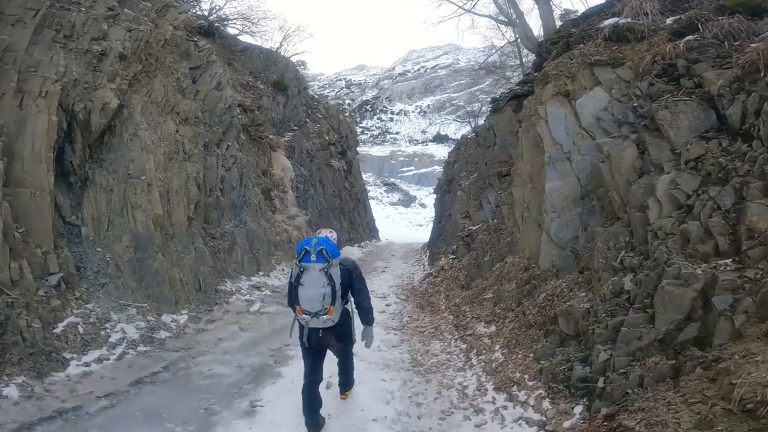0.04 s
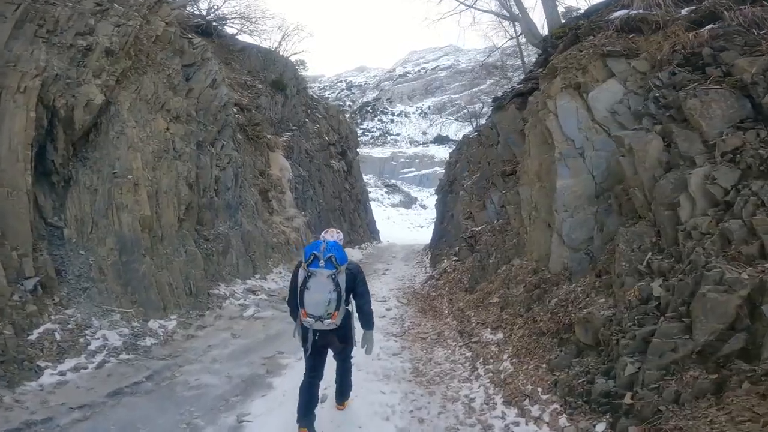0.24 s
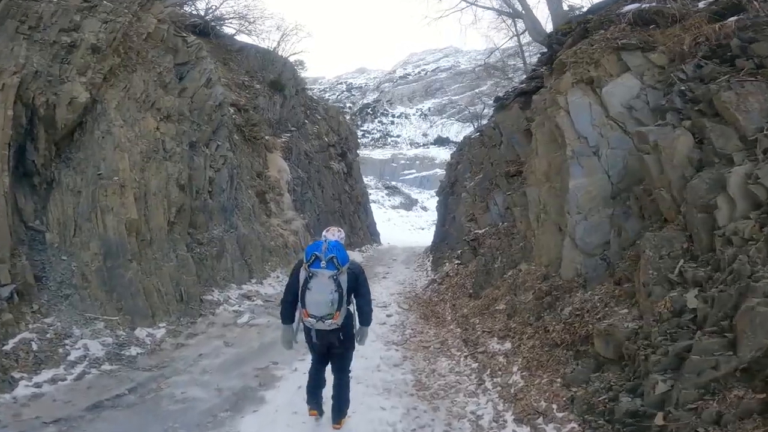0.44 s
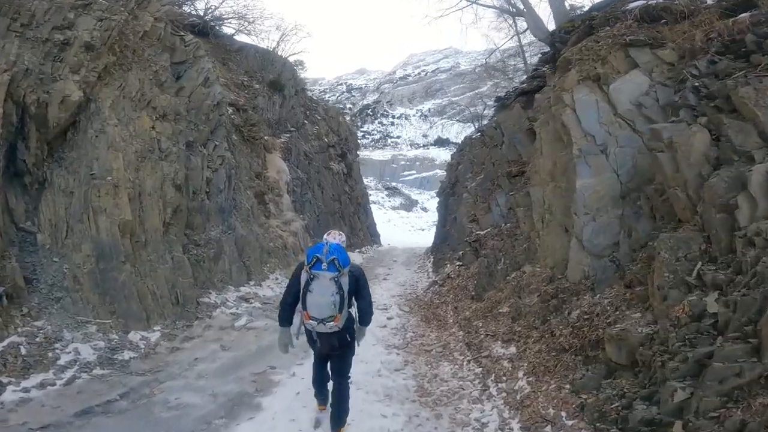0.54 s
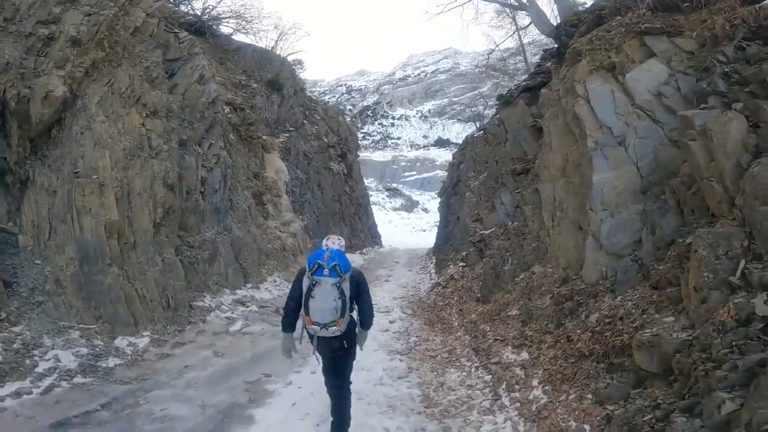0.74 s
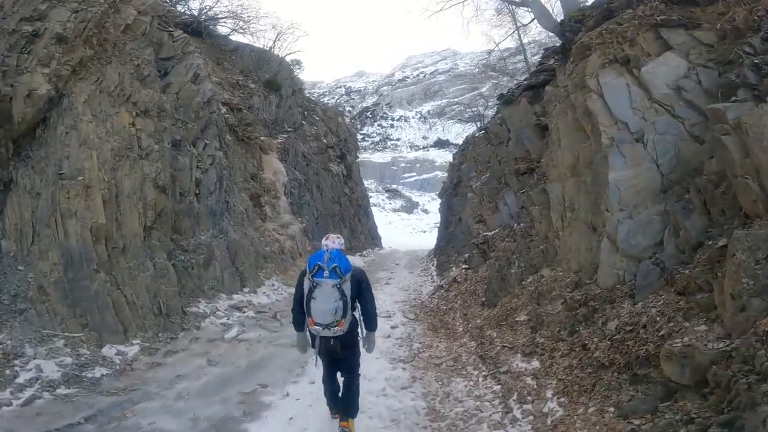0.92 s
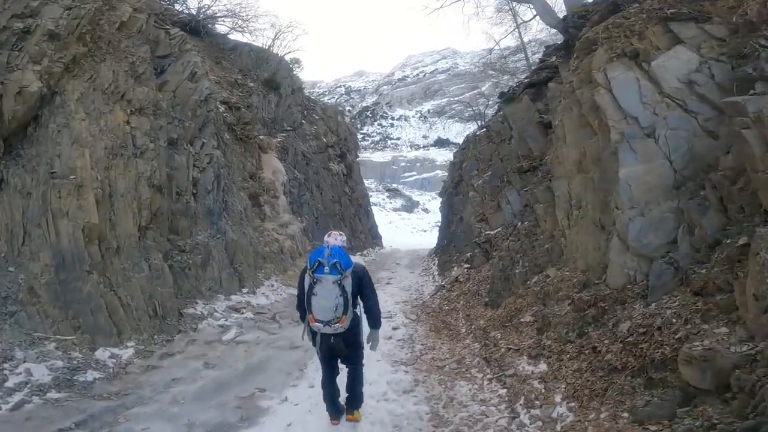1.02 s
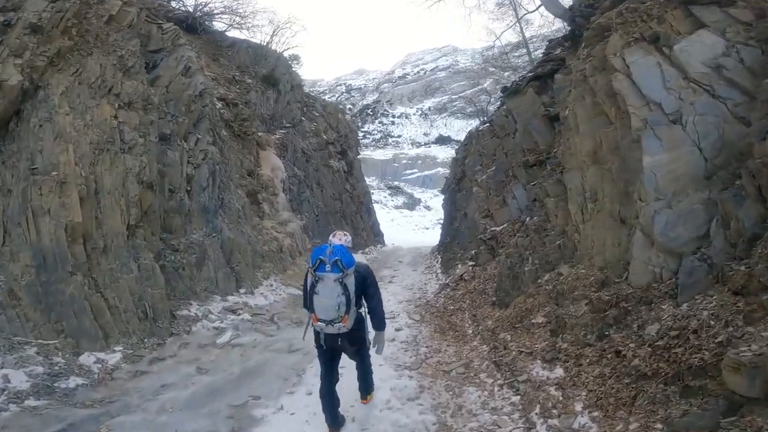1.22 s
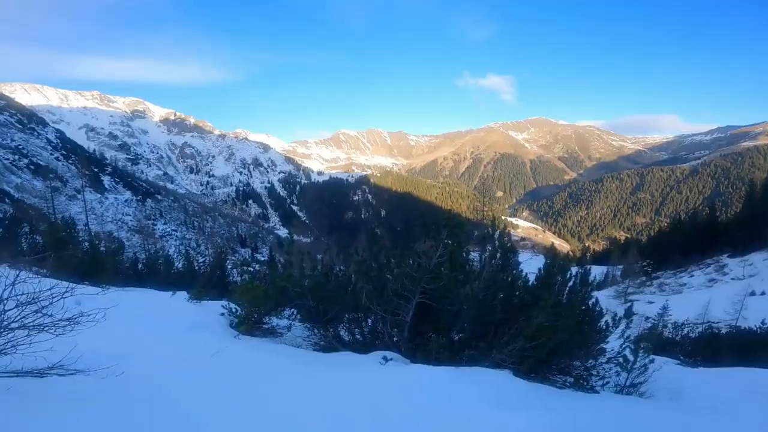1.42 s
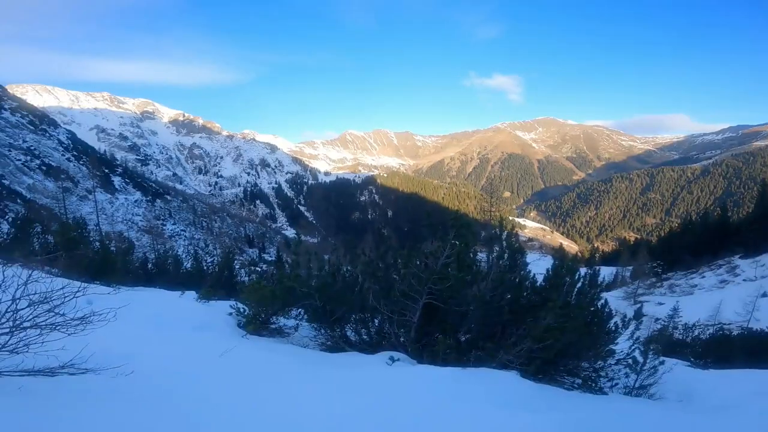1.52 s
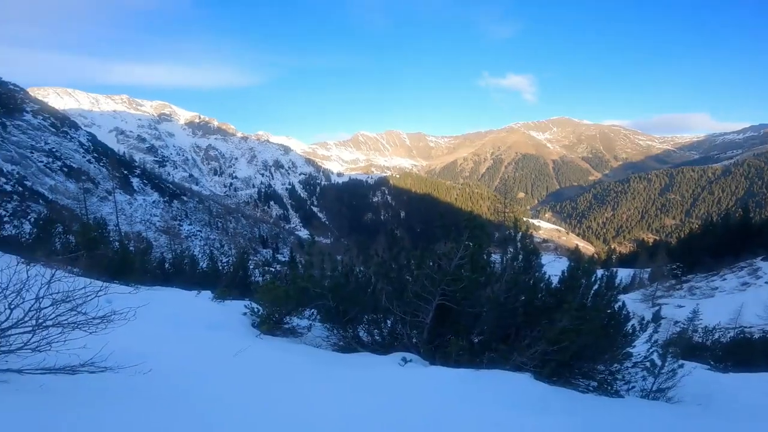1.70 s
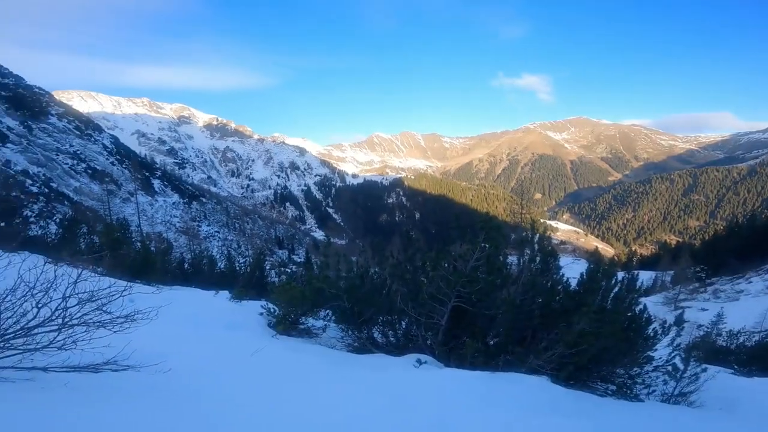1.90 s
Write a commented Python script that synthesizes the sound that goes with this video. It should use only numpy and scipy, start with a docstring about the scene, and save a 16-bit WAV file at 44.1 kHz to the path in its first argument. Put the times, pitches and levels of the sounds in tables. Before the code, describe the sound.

Boots crunch twice on icy grit, close to the microphone between rock walls, with a low wind gust thumping in between. The steps cut off abruptly, leaving a quiet valley with a light breeze and faint ticks.

```python
"""A hiker's two crunching steps on icy grit, close to the microphone in a rock cutting.
The crust snaps under the boot, then crumbles into dense grains; the walls give a short echo.
Between the steps a gust thumps the microphone. A third step has just begun when the scene
changes abruptly to a quiet snowy valley: a light breeze, far wind and a few faint ticks."""
import sys
import numpy as np
from scipy import signal
from scipy.fft import rfft, irfft, next_fast_len
from scipy.io import wavfile
from scipy.ndimage import uniform_filter1d, map_coordinates

SR = 44100
rng = np.random.default_rng(int(sys.argv[2]) if len(sys.argv) > 2 else 0)


def persist_wave(psi):
    """Save psi, clipped to +-1, as 16-bit WAV."""
    counts = np.round(np.clip(psi, -1, 1) * 32767).astype(np.int16)
    wavfile.write(sys.argv[1], SR, np.atleast_2d(counts).T)


N = 85995

# far wind in the valley, and wind pressure right on the microphone: (time [s], level [dB])
FAR_WIND_LEVEL = [(1.37, -55.5), (1.45, -60.5), (1.62, -56.5), (1.72, -60)]
RUMBLE_LEVEL = [(0, -38.5), (.058, -30), (.10, -35), (.17, -33), (.26, -44), (.35, -30.5), (.70, -30),
                (.76, -40.5), (.83, -39.5), (.89, -33.5), (.93, -38.5), (.975, -31), (1.05, -37),
                (1.125, -30), (1.17, -35.5), (1.32, -38), (1.46, -57), (1.54, -43.5), (1.72, -48.5),
                (1.76, -39), (1.83, -45), (1.95, -46.5)]
# the strong gust: (time [s], level [dB], rate at which eddies sweep past the microphone [Hz])
GUST_SWEEP = [(.33, -51, 60.03), (.378, -23.5, 85), (.395, -17, 144.9), (.426, -11.5, 204.6),
              (.452, -23.5, 99.7), (.478, -20, 120.8), (.503, -12, 205.6), (.535, -15, 109.8),
              (.568, -12.5, 119.5), (.595, -14.5, 58), (.645, -23.5, 60.8), (.68, -18.5, 76.4),
              (.708, -22, 54.8), (.745, -62, 50.2)]
# wind spectra: (frequency [Hz], relative density [dB])
FAR_WIND_SPECTRUM = [(100, -4.5), (260, -5), (370, 3), (520, -7.5), (900, -24.5), (1500, -12.5),
                     (2000, -20.5), (2700, -31), (7000, -34.5), (12000, -45.5), (15000, -67)]
RUMBLE_SPECTRUM = [(12, -6), (30, 6.5), (62, 0), (100, -10), (170, -15), (300, -26.5), (500, -47.5),
                   (4000, -120)]
EDDY_SPECTRUM = [(20, -7), (65, 0), (115, -0.5), (175, -9.5), (260, -19), (400, -34.5), (900, -62),
                 (4000, -120)]  # at the sweep rate EDDY_HZ

# soft rustles in the valley: (time [s], level [dB], t60 [s])
VALLEY_RUSTLES = [(1.357, -60.5, 0.37), (1.612, -59, 0.11)]
# faint dry ticks in the valley: (time [s], level before the tone filter [dB], pitch [Hz], knock [dB])
VALLEY_TICKS = [(1.517, -41, 910, -56), (1.587, -50, 1200, -51), (1.614, -54, 644, -42.5),
                (1.696, -49, 1080, -53), (1.774, -44.5, 1320, -49), (1.793, -47, 710, -48),
                (1.828, -53, 1250, -42.5), (1.884, -48, 1490, -43)]
# tone filters of the rustles and ticks: (frequency [Hz], gain [dB])
RUSTLE_FILTER = [(200, -16), (700, 6), (1500, 1), (2600, 1), (3500, -11), (5000, -28), (12000, -44)]
TICK_FILTER = [(300, 4), (1600, -2.5), (3000, -14.5), (9000, -12)]
# dull knocks under some of the contacts: (time [s], level [dB], pitch [Hz])
CONTACT_THUDS = [(0.069, -26.5, 215), (.168, -21, 188), (.718, -24.5, 224), (0.758, -24, 189),
                 (1.066, -26.5, 176), (1.341, -30, 163), (1.521, -33.5, 199)]

# loose grit shifting underfoot: (time [s], level [dB])
SHUFFLE_LEVEL = [(0, -42), (.04, -48), (.16, -44.5), (.36, -42.5), (.47, -50.5), (.58, -49), (.64, -38.5),
                 (.70, -42), (.8, -40.5), (1.08, -68), (1.2, -61.5), (1.3, -67)]
# the boot rolling on the grit:
# (time of full load [s], hold [s], level [dB], rise [dB/s], fall [dB/s], fizz re crunch [dB])
BOOT_STEPS = [(0.23, 0.069, -29.5, 149.5, 221, -37), (0.854, 0.11, -26.5, 139, 208, -50)]
# the crust snapping: (time [s], level [dB], pitch [Hz], attack [s], t60 [s], splinters re ring [dB])
CRUST_SNAPS = [(.067, -22, 1010, 0.0005, 0.019, -18), (.110, -29, 1040, 0.00062, 0.011, -25),
               (.136, -34, 1145, 0.0049, 0.032, -18), (.167, -27, 1064, 0.0018, .022, -8),
               (.179, -28.5, 915, 0.0012, 0.027, -24), (.211, -26.5, 1754, .003, 0.026, -5.5),
               (0.239, -30, 2970, 0.0049, 0.034, -11), (0.2494, -15.5, 1647, 0.00058, 0.02, -6),
               (0.309, -28, 956, .003, 0.036, -9), (.369, -31.5, 1175, 0.0045, 0.039, -15),
               (.418, -31, 900, 0.0061, 0.045, -9), (0.435, -27.5, 603, .003, 0.036, -16),
               (0.4848, -45, 7200, .0005, 0.011, 3), (.606, -39, 2772, .006, 0.066, -4),
               (0.6136, -16, 726, 0.00063, 0.027, -9.5), (.672, -26.5, 844, 0.0014, 0.027, -11),
               (.715, -37, 752, .005, 0.04, -7), (.758, -28.5, 874, 0.0022, 0.07, 0),
               (.782, -24.5, 1787, 0.0011, 0.021, 1), (.853, -23.5, 798, 0.0032, 0.039, -6.5),
               (.883, -25, 1900, 0.0033, 0.043, -4), (.968, -35, 4480, 0.0018, 0.024, 3),
               (.974, -22, 1003, 0.002, 0.028, -12), (1.000, -28.5, 1203, 0.0045, 0.05, -7.5),
               (1.038, -32, 567, 0.0057, 0.036, -8), (1.172, -39, 1390, 0.00043, 0.015, -16),
               (1.306, -37, 1196, 0.0004, 0.027, -12.5), (1.340, -35, 1057, 0.0011, 0.052, -8)]
# spectra of the ice and grit at the boot: (frequency [Hz], relative density [dB])
SHUFFLE_SPECTRUM = [(100, -5.5), (200, 1.5), (550, 0), (1300, 1), (2200, -6), (4000, -11), (6000, -19.5),
                    (7500, -23.5), (9500, -33), (15000, -53)]
SCUFF_SPECTRUM = [(100, -21), (600, -8), (1200, 2.5), (2200, -1.5), (3200, -15.5), (7500, -26),
                  (15000, -57)]
CRUNCH_SPECTRUM = [(88, -26.5), (150, 0.5), (238, 3.5), (306, 2.5), (458, -4), (784, -3.5), (1760, -3),
                   (5910, -21), (7200, -24), (9190, -39.5), (12500, -48), (14900, -77)]
FIZZ_SPECTRUM = [(500, -53.5), (5000, -21.5), (8000, -4), (10000, -4), (13000, -1), (15000, -12)]
CRUMB_SPECTRUM = [(100, -19), (800, -15.5), (1400, -6), (2200, -6), (3800, -2), (6000, -7), (7500, -7.5),
                  (9500, -19.5), (14000, -28)]
SPLINTER_SPECTRUM = [(100, -23), (500, 7.5), (1000, 7), (2000, 2.5), (3000, -2.5), (4500, -3.5),
                     (6000, -18), (7500, -15), (9500, -35), (12500, -39), (15000, -62)]

VALLEY_START_S, EDDY_HZ, TOP_HZ = 1.357, 150, 15000
WALL_T60_S, WALL_DB = 0.13, -12.5
GRAIN_HZ, GRAIN_OCTAVES, GRAIN_T60_CYCLES, POWDER_DB = 2060, 4.2, 3.8, -3
RING_ROUGHNESS, RING_SPLIT = .12, 0.1397  # phase noise; share by which two modes flank the pitch
SCUFF_S, SCUFF_DB, SCUFF_ATTACK_S = 1.304, -47.5, .004
CRUMB_RE_STEP_DB, CRUMB_DELAY_S, CRUMB_RISE_DB_PER_S, CRUMB_FALL_DB_PER_S = -23.5, 0.019, 288, 58.5


def amp(db):
    """Decibels to gain."""
    return 10 ** (np.asarray(db) / 20)


def unit(x):
    """Scale to rms 1."""
    return x / np.sqrt(np.mean(x ** 2) + 1e-20)


def curve(rows):
    """(time [s], value) points as one value per sample."""
    return np.interp(np.arange(N) / SR, *np.transpose(rows))


def colour(x, points):
    """Minimum-phase filter through (frequency [Hz], gain [dB]) points."""
    size = 2 * next_fast_len(len(x))
    hz, db = np.transpose(points)
    gain = amp(np.interp(np.log(np.fft.rfftfreq(size, 1 / SR) + 1), np.log(hz), db))
    cepstrum = irfft(np.log(gain), size)
    cepstrum[1:size // 2] *= 2  # folding onto positive time makes the filter causal
    cepstrum[size // 2 + 1:] = 0
    return irfft(rfft(x, size) * np.exp(rfft(cepstrum)), size)[:len(x)]


def noise(spectrum):
    """Coloured noise of rms 1."""
    return unit(colour(rng.standard_normal(N + SR), spectrum)[-N:])


def even(x, span_s):
    """Hold a noise at a steady strength over span_s."""
    power = uniform_filter1d(x ** 2, max(int(span_s * SR), 2))
    return x / np.sqrt(np.abs(power) + 1e-9)


def add(track, start_s, sound):
    """Mix a sound in at start_s."""
    part = track[max(round(start_s * SR), 0):][:len(sound)]
    part += sound[:len(part)]


def far_wind():
    """A soft wash of air from far off in the valley."""
    return amp(curve(FAR_WIND_LEVEL)) * noise(FAR_WIND_SPECTRUM)


def microphone_rumble():
    """The breeze presses directly on the microphone."""
    return amp(curve(RUMBLE_LEVEL)) * even(noise(RUMBLE_SPECTRUM), span_s=0.0433)


def gust():
    """Eddies sweep past the microphone: the faster the gust, the higher its flapping reaches."""
    rows = np.array(GUST_SWEEP)
    level_db, sweep_hz = curve(rows[:, :2]), curve(rows[:, [0, 2]])
    travel = np.cumsum(sweep_hz / EDDY_HZ)
    pressure = map_coordinates(noise(EDDY_SPECTRUM), [travel], mode="mirror")
    return amp(level_db) * even(pressure, span_s=.025)


def rock_walls(direct):
    """The direct sound plus a short diffuse echo from the sides of the cutting."""
    t = np.arange(SR // 4) / SR
    tail = rng.standard_normal(len(t)) * amp(-60 * t / WALL_T60_S) * (t > .004)
    echo = signal.fftconvolve(direct, tail / np.linalg.norm(tail))[:N]
    return direct + amp(WALL_DB) * echo


def thud(hz, t60):
    """A dull knock: one quickly damped mode."""
    t = np.arange(SR // 5) / SR
    return np.sin(2 * np.pi * hz * t) * amp(-60 * t / t60)


def small_contacts():
    """Faint ticks over hollow knocks and soft rustles in the valley; dull thuds in both places."""
    out, t = np.zeros(N), np.arange(SR // 5) / SR
    for start_s, db, hz, knock_db in VALLEY_TICKS:
        tick = snap(hz, attack_s=0.00042, t60=0.011, splinters_db=-5.5)
        add(out, start_s, amp(db) * colour(tick, TICK_FILTER))
        add(out, start_s, amp(knock_db) * thud(hz=382, t60=0.034))
    for start_s, db, hz in CONTACT_THUDS:
        add(out, start_s, amp(db) * thud(hz, t60=0.061))
    for start_s, db, t60 in VALLEY_RUSTLES:
        add(out, start_s, amp(db - 60 * t / t60) * noise(RUSTLE_FILTER)[:len(t)])
    return out


def grains(spectrum, per_s, spread_db):
    """Tiny ice fractures of random size and pitch over a powdery hiss, rms 1."""
    onset, pitch, chance, phase = np.hsplit(rng.random((int(per_s * N / SR), 4)), 4)
    t = np.arange(SR // 200) / SR
    cycles = GRAIN_HZ * 2 ** (GRAIN_OCTAVES * (pitch - .5)) * t
    size = amp(-spread_db * np.log(np.maximum(chance, .01)))  # many small, a few large
    balance = np.sqrt(cycles[:, 1:2])  # gives short, high grains as much energy as low ones
    decay = amp(-60 * cycles / GRAIN_T60_CYCLES)
    waves = size * balance * np.cos(2 * np.pi * (cycles + phase)) * decay
    positions = (onset * N).astype(int) + np.arange(len(t))
    summed = np.bincount(positions.ravel(), waves.ravel(), N)[:N]
    cracks = unit(colour(summed, spectrum))
    return even(cracks + amp(POWDER_DB) * noise(spectrum), span_s=0.07)


def snap(hz, attack_s, t60, splinters_db):
    """One fracture: a short rough ring of two close modes and a spray of splinters."""
    t = np.arange(SR // 10) / SR
    envelope = amp(-60 * t / t60) * (1 - np.exp(-t / attack_s))
    envelope /= envelope.max()
    jitter = uniform_filter1d(rng.standard_normal((2, len(t))), size=12)
    jitter = uniform_filter1d(jitter, size=9)
    drift = np.cumsum(jitter, axis=1) * RING_ROUGHNESS * np.sqrt(hz / 1000)
    modes_hz = hz * np.array([[1 - RING_SPLIT], [1 + RING_SPLIT]])
    ring = np.sin(2 * np.pi * modes_hz * t + drift).sum(axis=0) / np.sqrt(2) * envelope
    chips = even(rng.standard_normal(len(t)), span_s=0.00042)
    spray = colour(chips * envelope, SPLINTER_SPECTRUM) / np.std(colour(chips, SPLINTER_SPECTRUM))
    return ring + amp(splinters_db) * spray


def scuff():
    """The sole lands and drags over the grit as the third step begins."""
    contact = np.clip((np.arange(N) / SR - SCUFF_S) / SCUFF_ATTACK_S, 0, 1)
    return amp(SCUFF_DB) * contact * grains(SCUFF_SPECTRUM, per_s=1300, spread_db=3.5)


def footsteps():
    """Close up, the crunch follows the boot's load; the crust snaps and kicked-up crumbs patter down."""
    t = np.arange(N) / SR
    crunch = grains(CRUNCH_SPECTRUM, per_s=2600, spread_db=3)
    fizz = grains(FIZZ_SPECTRUM, per_s=700, spread_db=5)
    crumbs = grains(CRUMB_SPECTRUM, per_s=1800, spread_db=2)
    out = amp(curve(SHUFFLE_LEVEL)) * grains(SHUFFLE_SPECTRUM, per_s=1100, spread_db=2.5)
    for loaded_s, hold_s, db, rise, fall, fizz_db in BOOT_STEPS:
        lift_s = loaded_s + hold_s
        load = amp(db - rise * np.maximum(loaded_s - t, 0) - fall * np.maximum(t - lift_s, 0))
        out += load * (crunch + amp(fizz_db) * fizz)
        past_peak_s = t - lift_s - CRUMB_DELAY_S  # the patter peaks just after the boot lifts
        drop_db = np.maximum(-CRUMB_RISE_DB_PER_S * past_peak_s, CRUMB_FALL_DB_PER_S * past_peak_s)
        out += amp(db + CRUMB_RE_STEP_DB - drop_db) * crumbs
    for start_s, db, hz, attack_s, t60, splinters_db in CRUST_SNAPS:
        add(out, start_s, amp(db) * snap(hz, attack_s, t60, splinters_db))
    return out


def scene():
    """One microphone, two places: the steps stop dead where the valley begins; the wind goes on."""
    in_cutting = np.clip((VALLEY_START_S - np.arange(N) / SR) / 0.0025, 0, 1)
    steps = in_cutting * rock_walls(footsteps() + scuff())
    return (steps + small_contacts() + microphone_rumble() + gust() + far_wind())[None]


def record(dry):
    """The camera's microphone passes nothing above its band limit."""
    size = next_fast_len(N + SR // 2)
    passband = np.fft.rfftfreq(size, 1 / SR) < TOP_HZ
    return irfft(rfft(dry, size) * passband, size)[..., :N]


dry = scene()
out = record(dry)
persist_wave(out)
```